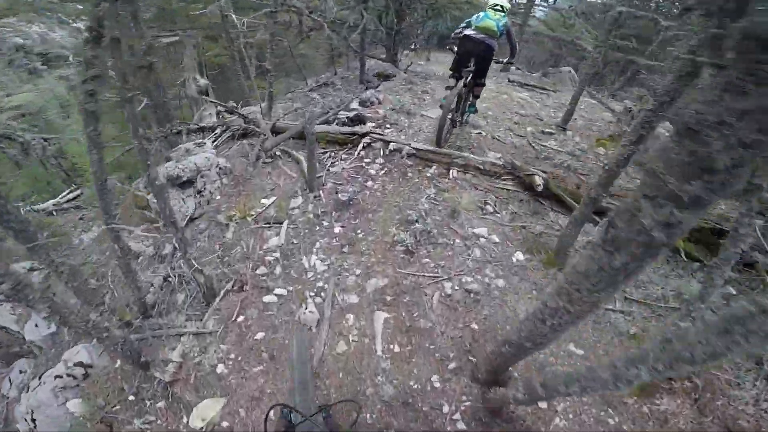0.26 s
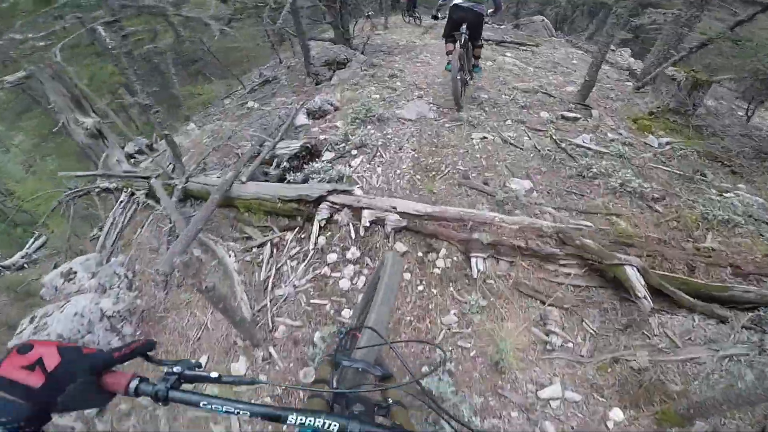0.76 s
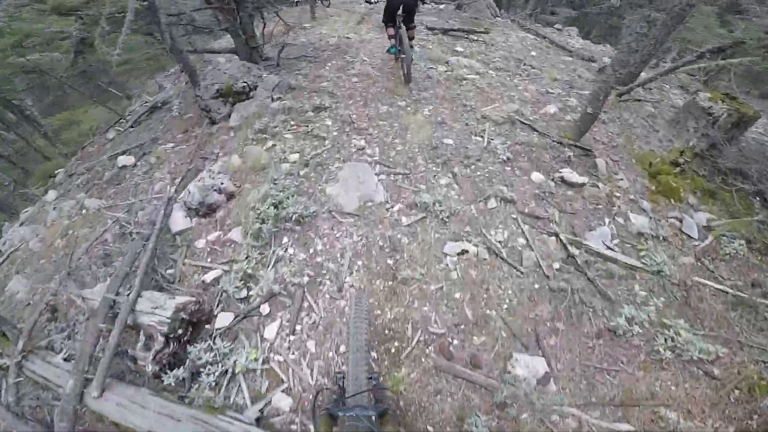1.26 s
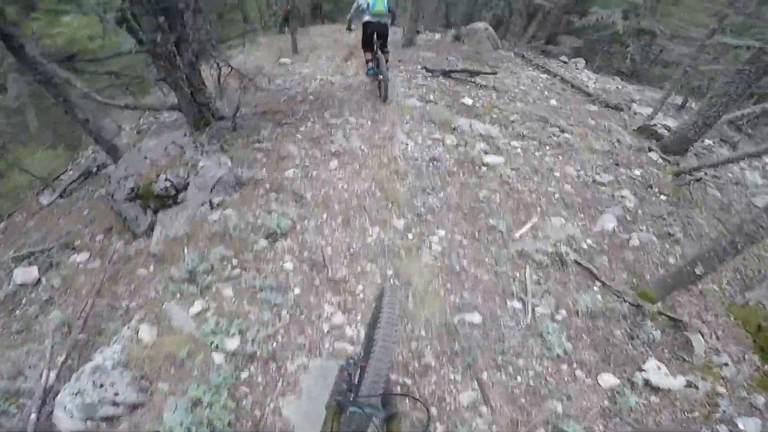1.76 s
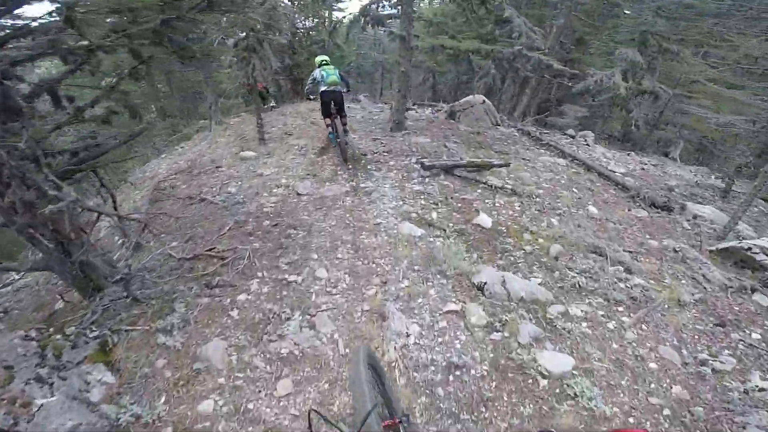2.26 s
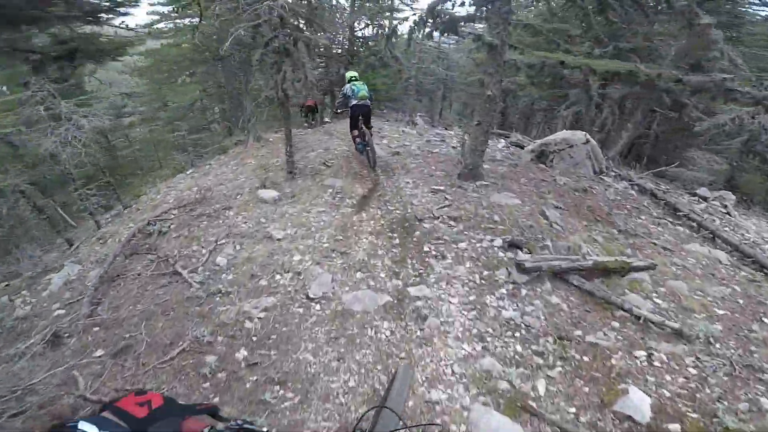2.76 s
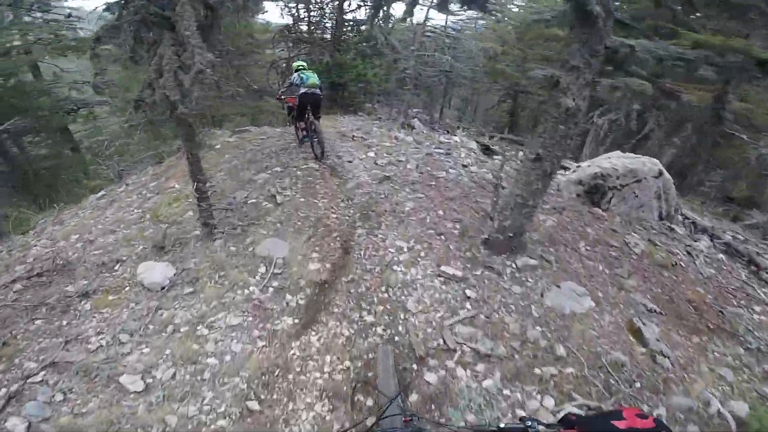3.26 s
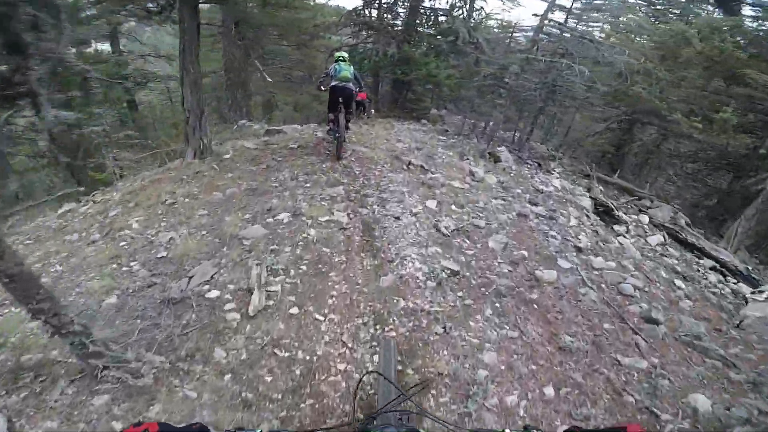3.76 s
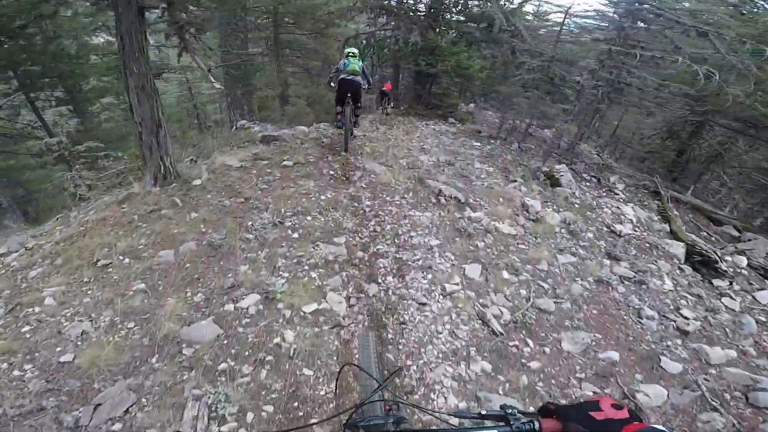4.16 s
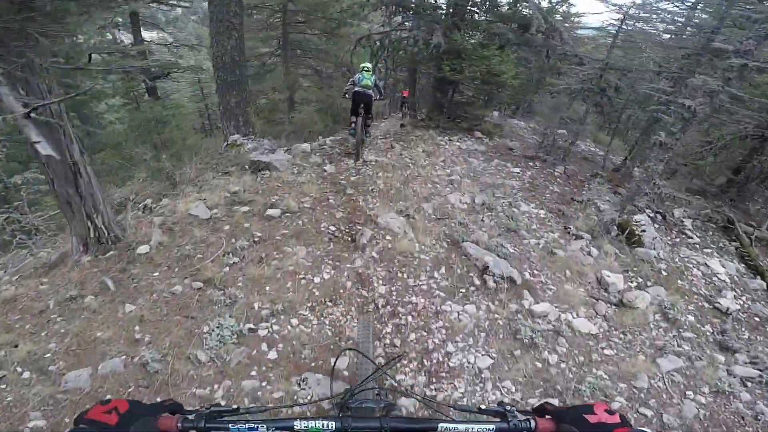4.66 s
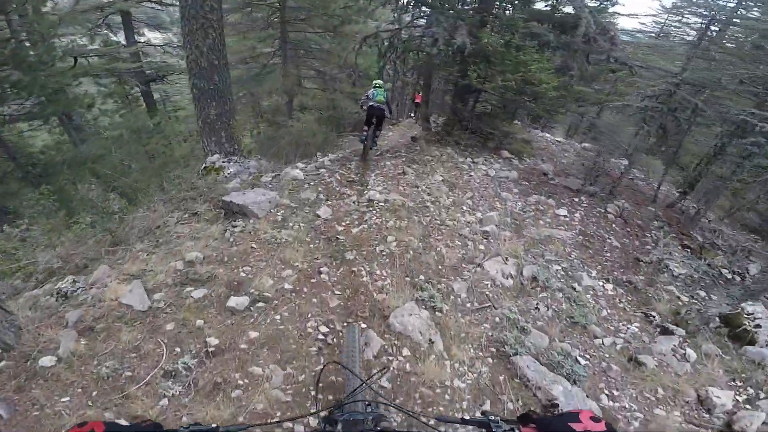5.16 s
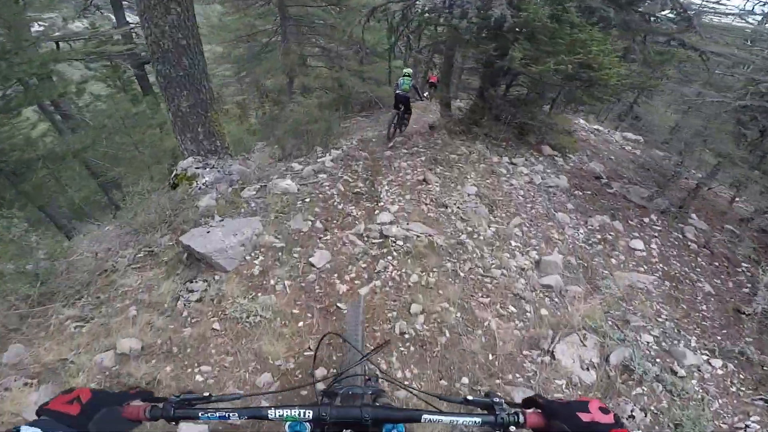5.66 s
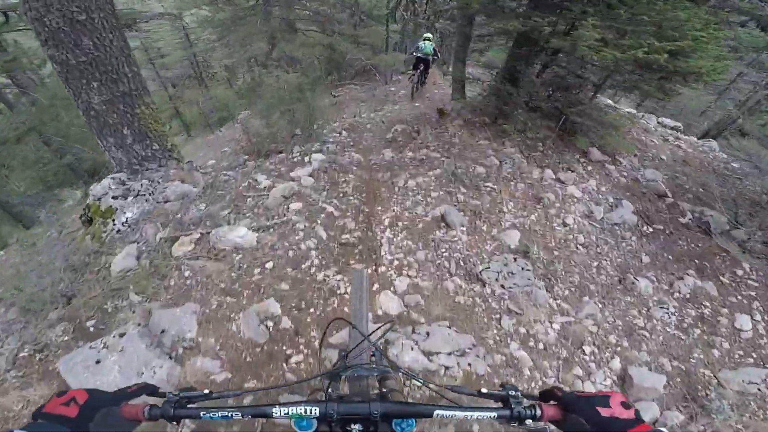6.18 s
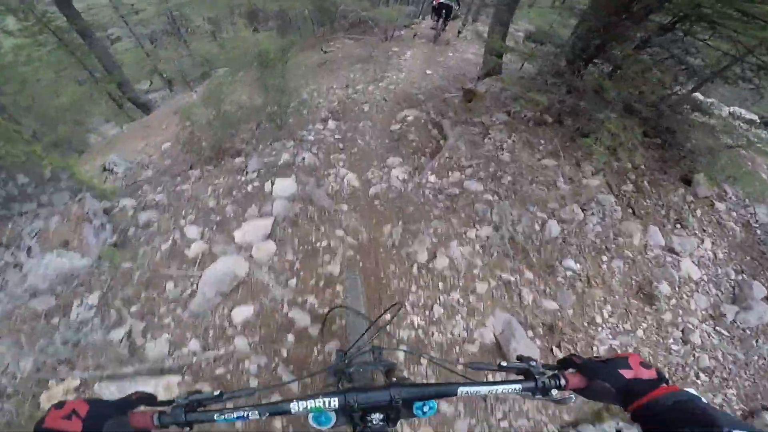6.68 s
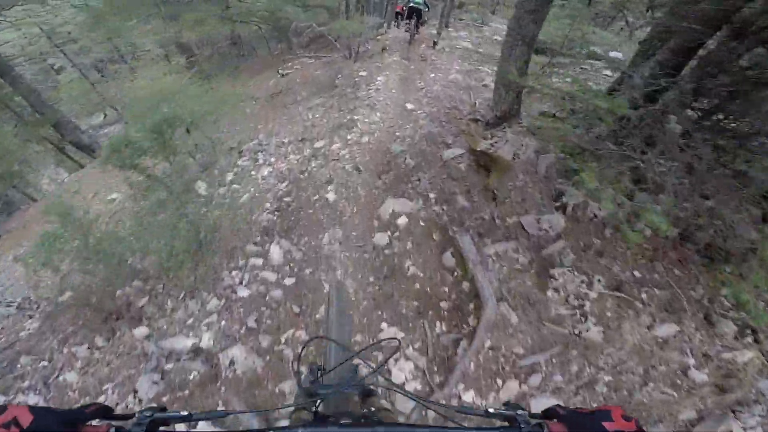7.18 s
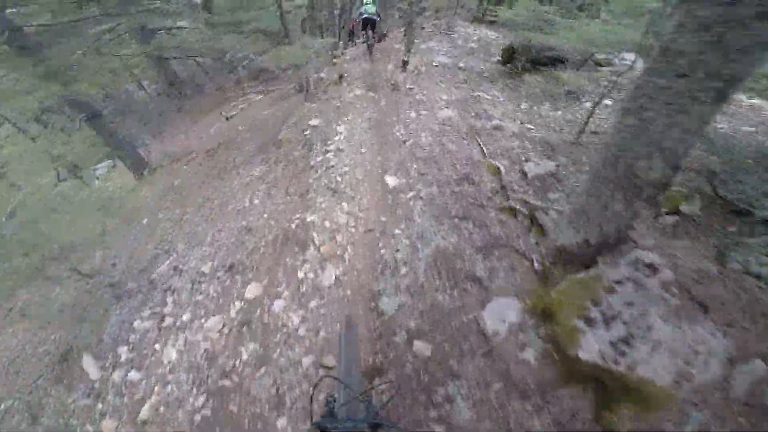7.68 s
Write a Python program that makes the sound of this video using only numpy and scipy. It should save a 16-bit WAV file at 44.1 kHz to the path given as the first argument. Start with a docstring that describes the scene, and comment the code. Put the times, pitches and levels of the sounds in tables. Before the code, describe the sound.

A mountain bike descends a stony forest trail, heard from a camera on the rider, dry and without echo. Throughout, deep wind rumble and fluttering gusts press on the microphone, with a thin air hiss above, continuous gravel crunch, gritty spray and popping pebbles. From 0 to 1.1 s heavy dull jolts thump, with a wheel slam and hollow knock near 1 s. Around 1.3-1.9 s come a rattle, knocks, chain ticks and sliding stones; another strong thump at 2.4 s. Stones clack on the frame from 2.6 to 3.7 s, then a hard slam with spraying gravel at 4 s. From 4.2 to 6 s it is calmer, mostly rolling crunch and wind, with small knocks near 5.2 s. From 6.1 s jolts return, peaking in thuds and rattles near 6.9 s. A wavering low brake hum sounds briefly at 7.1 s and 7.8 s amid busy metallic chain ticks, clanks and final slams at 7.5-7.9 s.

```python
"""Stony forest trail: a mountain bike runs down it fast, heard from a camera on the rider.
Tyres crunch, pop and spray stones (coloured random impacts, short decaying sines); jolts thump (sagging sines).
Slams are noise bursts; rattles and clacks ring resonators; knocks and clangs are decaying sines.
The chain ticks (gated noise through resonators) and a brake hums near the end (wavering sine, narrow noise).
Wind buffets the camera case and air hisses past (shaped noise)."""
import sys
import numpy as np
from scipy import signal
from scipy.fft import rfft, irfft
from scipy.io import wavfile
from scipy.ndimage import uniform_filter1d

SR = 44100
rng = np.random.default_rng(int(sys.argv[2]) if len(sys.argv) > 2 else 0)


def unload_wav(signal):
    """Save mono or channel-first audio to the path in sys.argv[1] as 16-bit WAV at rate SR, clipped to [-1, 1]."""
    wavfile.write(
        sys.argv[1],
        SR,
        np.round(np.clip(np.atleast_2d(signal).T, -1, 1) * 32767).astype(np.int16),
    )


N = 349713
TIME = np.arange(N) / SR
FREQS = np.fft.rfftfreq(N, 1 / SR)


def undb(db):
    """Decibels to gain."""
    return 10 ** (np.asarray(db) / 20)


def unit(x):
    """Scale to rms 1."""
    return x / np.sqrt(np.mean(x ** 2) + 1e-20)


def curves(table):
    """Columns of a (t/s, ..) table, interpolated to one value a sample."""
    s, *columns = np.transpose(table)
    return [np.interp(TIME, s, c) for c in columns]


def colour(x, points):
    """Filter by (f/Hz, level/dB) points; falls 23 dB/octave beyond the ends."""
    hz, db = np.transpose(points)
    octave, known = np.log2(FREQS + 1), np.log2(hz)
    outside = np.abs(octave - np.clip(octave, known.min(), known.max()))
    gain_db = np.interp(octave, known, db) - 23 * outside
    return irfft(rfft(x) * undb(gain_db), N)


def resonate(x, hz, width):
    """One resonance, gain 1 at its centre."""
    b, a = signal.iirpeak(min(hz, SR / 3), hz / min(width, SR / 5), fs=SR)
    return signal.lfilter(b, a, x)


def muffle(x, hz):
    """Steep low-pass."""
    return signal.sosfilt(signal.butter(4, min(hz, SR / 3), fs=SR, output="sos"), x)


def lowpass(x, order, hz):
    """Zero-phase low-pass, for splitting bands."""
    return signal.sosfiltfilt(signal.butter(order, hz, fs=SR, output="sos"), x)


def walk(rate):
    """Random levels held 1 / rate s and slewed; rms 1."""
    k = max(int(SR / rate), 1)
    held = np.repeat(rng.standard_normal(N // k + 1), k)
    return unit(uniform_filter1d(held, k)[:N])


def fade(t, t60):
    """Exponential decay, 60 dB down after t60."""
    return np.exp(-np.log(1000) * t / max(t60, 1e-3))


def add(out, s, sound, db):
    """Mix a sound in at time s; db is the level of its loudest 2 ms."""
    start = max(int(s * SR), 0)
    part = sound[:max(N - start, 0)]
    loudest = np.sqrt(uniform_filter1d(sound ** 2, size=88).max())
    out[start:start + len(part)] += undb(db) * part / loudest


def grains(rate, spread_db):
    """Random tiny impacts: many faint, a few strong."""
    size = undb(spread_db * np.minimum(rng.exponential(size=N), 4.5))
    return unit((rng.random(N) < rate / SR) * size * rng.choice([-1, 1], N))


# tyre levels before trim: [t/s, crunch level/dB, grit level/dB]
TYRE_LEVELS = [(0.03, -36, -46), (0.2, -40, -47), (0.73, -40.5, -46.5), (1.19, -46, -53.5),
               (1.66, -38.5, -47), (1.86, -38.5, -45), (2.56, -42.5, -50), (3.0, -37.5, -47.5),
               (3.42, -42.5, -51), (4.03, -35, -46.5), (4.14, -37, -48), (4.69, -40, -51),
               (5.12, -39, -50.5), (5.47, -41, -51), (5.8, -43, -53), (6.07, -38.5, -48.5),
               (6.78, -38.5, -48), (7.07, -34, -48), (7.42, -37, -47.5), (7.88, -39, -50)]
# crushed-stone spectrum, relative: [f/Hz, level/dB]
CRUNCH_SPECTRUM = [(210, 4.5), (350, 1.5), (503, -2.5), (585, -2), (742, -5.5), (1110, -6.5), (1430, -7.5),
                   (1560, -27), (2110, -7.5), (2300, -29.5), (2900, -32), (3770, -26), (6380, -120)]
# fine-grit spectrum, relative: [f/Hz, level/dB]
GRIT_SPECTRUM = [(1470, 9.5), (2500, 6.5), (2840, 0.5), (3110, 3.5), (3530, 0), (3870, -1.5), (4390, 0.5),
                 (5010, -6.5), (5900, 0), (6200, 2), (6910, -12), (7400, -18), (9620, -45), (16300, -120)]
# ploughed-stone spectrum, relative: [f/Hz, level/dB]
PLOUGH_SPECTRUM = [(250, 4), (430, 3.5), (582, -5), (816, -2), (916, -11), (1000, -3), (1280, -0.5),
                   (1570, -13), (1820, -8), (2760, -46), (3120, -38), (3600, -16), (4680, -64),
                   (7920, -120)]
CRUNCH_TRIM_DB, GRIT_TRIM_DB = 1, 2


def tyres(crunch_db, grit_db):
    """Knobs crush stones and spray grit in uneven patches; bumps dig in and plough bigger stones aside."""
    dig = np.zeros(N)
    for s, db, _, t60 in BUMP_RATTLES:
        bite = np.clip((TIME - s) / 0.00083 + .5, 0, 1)
        dig += undb(db) * bite * fade(np.maximum(TIME - s, 0), 4.7 * t60)
    patch = walk(45)
    stones = unit(colour(grains(rate=800, spread_db=1.5), CRUNCH_SPECTRUM))
    big = lowpass(stones, 2, 900)
    coarse_db = 0.96 * walk(30)  # ground varies between coarse and fine stones
    mixed = big * undb(coarse_db) + (stones - big) * undb(-coarse_db)
    crunch = mixed * undb(crunch_db + 2.1 * patch + CRUNCH_TRIM_DB)
    ploughed = unit(colour(grains(rate=1200, spread_db=2.5), PLOUGH_SPECTRUM)) * undb(-5.0) * dig
    grit = unit(colour(grains(rate=6700, spread_db=2.5), GRIT_SPECTRUM))
    rolling = undb(grit_db + 0.43 * patch + 1.42 * walk(110) + GRIT_TRIM_DB)
    return crunch + ploughed + grit * np.hypot(rolling, undb(-18.5) * dig)


PEBBLE_DB = -3  # against the untrimmed crunch
PEBBLE_HZ, PEBBLE_T60_S = (570, 2292), (0.0087, 0.078)  # big to small; dead to ringing


def pebbles(crunch_db, count):
    """Pebbles pop from under the knobs, each with its own pitch and ring; each strikes again within 18 ms."""
    out, t = np.zeros(N), TIME[:SR // 25]
    for when, size, ring, bounce in rng.random((count, 4)):
        hz = np.interp(size, (0, 1), PEBBLE_HZ)
        t60 = np.interp(ring, (0, 1), PEBBLE_T60_S)
        main = np.sin(2 * np.pi * hz * t) * fade(t, t60)
        low = np.sin(2 * np.pi * 0.577 * hz * t) * fade(t, t60 / 2)
        pop = main - undb(-4.0) * low
        at = int(when * N)
        db = crunch_db[at] + PEBBLE_DB
        add(out, TIME[at], pop, db)
        add(out, TIME[at] + 0.018 * bounce, pop, db - 1.5)
    return muffle(out, 2600)


# tyre slides that throw stones: [t/s, length/s, level/dB, middle f/Hz]
SLIDE_SPRAYS = [(1.74, 0.093, -37.5, 1010), (2.215, 0.033, -31.5, 980), (3.932, 0.059, -32.5, 970),
                (4.045, 0.059, -32.5, 890), (5.125, 0.051, -36.5, 690), (5.178, 0.073, -35, 770),
                (6.113, 0.07, -46, 1000), (6.886, 0.04, -29, 1160), (6.959, 0.11, -35, 1300),
                (7.661, 0.036, -30, 1380)]
SPRAY_STONES_PER_S, SPRAY_OCTAVES = 850, 0.74  # octaves either side of the middle
SPRAY_T60_CYCLES = 8.4


def sprays(count):
    """A sliding tyre throws stones in quick uneven succession, each clicking at its own pitch and strength."""
    out, t = np.zeros(N), TIME[:SR // 5]
    for s, length, db, middle_hz in SLIDE_SPRAYS:
        jitter, size, strength, side = rng.random((4, count, 1))
        when = (np.arange(count)[:, None] + 2 * jitter - 1) / SPRAY_STONES_PER_S
        hz = middle_hz * 2 ** (SPRAY_OCTAVES * (1 - 2 * size))
        cycles = np.maximum(t - when, 0) * hz
        within = np.clip((length - when) / 0.013 + .5, 0, 1)
        weight = np.sign(side - .5) * undb(10 * strength) * within
        clicks = weight * np.sin(2 * np.pi * cycles) * fade(cycles, SPRAY_T60_CYCLES)
        shower = np.sum(clicks, axis=0)
        rms = np.sqrt(np.sum(shower ** 2) / (length * SR))
        start = int(s * SR)
        out[start:start + len(t)] += (undb(db) * shower / rms)[:N - start]
    return muffle(out, 4600)


# jolts through the rider: [t/s, level before 3 dB cut/dB, nominal f/Hz, t60/s]
JOLTS = [(0.035, -9, 245, 0.018), (0.65, -8, 129, 0.094), (0.806, -7.5, 248, 0.058),
         (0.878, -13, 166, 0.086), (0.944, -11, 216, 0.044), (1.077, -11, 238, 0.036),
         (1.371, -21, 378, 0.024), (1.772, -14.5, 185, 0.038), (2.191, -14.5, 220, 0.025),
         (2.446, -6, 110, 0.039), (3.153, -9, 210, 0.032), (4.016, -13, 324, 0.063),
         (5.315, -23, 335, 0.032), (5.507, -23.5, 257, 0.025), (6.062, -11, 168, 0.073),
         (6.16, -21, 188, 0.072), (6.476, -14, 288, 0.025), (6.602, -13.5, 225, 0.014),
         (6.735, -11, 222, 0.093), (6.88, -9, 227, 0.031), (6.92, -14, 311, 0.077),
         (6.959, -6.5, 180.4, 0.18), (6.972, -13.5, 290, 0.094), (7.502, -8, 267, 0.038),
         (7.547, -14.5, 302, 0.027), (7.662, -16, 272, 0.033), (7.886, -9.5, 218, 0.037)]


def thumps():
    """A jolt shakes the camera mount for a few dull cycles; the note sags as the load comes off."""
    out, t = np.zeros(N), TIME[:SR // 5]
    for s, db, hz, t60 in JOLTS:
        push = 1 - fade(t, 0.024)
        phase = 2 * np.pi * hz * np.cumsum(0.911 + 0.15 * fade(t, 2 * t60)) / SR
        note = np.sin(phase) + undb(-11.5) * np.sin(1.47 * phase)
        add(out, s, push * note * fade(t, t60), db - 3.0)
    return out


# wheel into ground or rock: [t/s, level/dB, bottom f/Hz, top f/Hz, contact/s]
WHEEL_SLAMS = [(0.81, -22, 230, 650, 0.005), (1.049, -17.5, 350, 830, 0.0036),
               (3.986, -20, 950, 2400, 0.0029), (4.014, -13.5, 200, 1330, 0.012),
               (6.882, -16, 220, 1300, 0.013), (6.903, -21, 600, 1850, 0.0098),
               (6.958, -20, 300, 2140, 0.0069), (7.659, -20.5, 248, 2170, 0.011),
               (7.69, -20.5, 600, 2000, 0.008), (7.888, -18.5, 850, 1770, 0.0016)]
# bike response to a slam, relative: [f/Hz, level/dB]
THUD_SPECTRUM = [(200, 4), (380, 2), (650, -8.5), (900, -13), (1200, -7.5), (1650, -10), (2400, -20.5),
                 (4000, -3)]
SLAM_T60_S = 0.042


def slams():
    """A wheel hits hard: the whole bike judders while contact lasts, then stops short."""
    out, t = np.zeros(N), TIME[:SR // 10]
    judder = colour(rng.standard_normal(N), THUD_SPECTRUM)
    for s, db, bottom_hz, top_hz, contact_s in WHEEL_SLAMS:
        body = np.roll(judder, -int(s * SR))[:len(t)]
        body = muffle(muffle(body, top_hz), top_hz)
        body = signal.sosfilt(signal.butter(3, bottom_hz, "highpass", fs=SR, output="sos"), body)
        body = body / np.sqrt(uniform_filter1d(body ** 2, size=176) + 1e-20)  # even strength
        envelope = (1 - fade(t, 0.0019)) * fade(np.maximum(t - contact_s, 0), SLAM_T60_S)
        add(out, s, body * envelope, db)
    return out


# bumps over rock or root: [t/s, level before 4 dB cut/dB, clang centre f/Hz, blows t60/s]
BUMP_RATTLES = [(1.311, -27.5, 645, 0.13), (1.739, -21.5, 732, 0.065), (1.755, -45, 1090, 0.067),
                (3.2, -27.5, 552, 0.088), (3.464, -29.5, 1300, 0.05), (3.888, -25.5, 670, 0.12),
                (6.103, -25.5, 1250, 0.034), (6.89, -18.5, 810, 0.091), (6.966, -27.5, 1390, 0.061),
                (7.012, -27, 1000, 0.039), (7.516, -25.5, 900, 0.072), (7.699, -23, 1400, 0.043)]
# bike modes, also rung by clacks: [nominal f/Hz, width/Hz, relative level/dB]
FRAME_MODES = [(456, 81, 28), (650, 150, 21), (810, 66, -3), (810, 170, 15), (1240, 96, 17.5),
               (1240, 160, 20), (1440, 42, 15.5), (1640, 120, 9), (3300, 330, 8)]


def rattles():
    """Bumps set loose parts chattering; quick blows ring the frame modes near the clang's centre."""
    out, t = np.zeros(N), TIME[:SR // 4]
    for s, db, centre_hz, t60 in BUMP_RATTLES:
        blows = rng.standard_normal(len(t)) * (rng.random(len(t)) < 800 / SR) * fade(t, t60)
        blows[0] = 1.26  # a firm first blow
        shift = 1 + 0.02 * rng.standard_normal(len(FRAME_MODES))  # load on the bike moves the modes
        ring = np.zeros(len(t))
        for k, (hz, width, gain_db) in enumerate(FRAME_MODES):
            gain = undb(gain_db - 19 * abs(np.log2(hz / centre_hz)))
            ring += (-1) ** k * gain * resonate(blows, hz * shift[k], width)
        add(out, s, ring, db - 4.0)
    return muffle(out, 4400)


# stones on frame and rims: [t/s, level before final low-passes/dB, f/Hz]
STONE_CLACKS = [(2.189, -29.5, 1310), (2.621, -28, 1320), (2.772, -26.5, 990), (3.195, -27, 1990),
                (3.379, -27.5, 1200), (3.549, -25.5, 920), (3.629, -19, 1380), (3.666, -23.5, 1740),
                (3.961, -26, 1500), (4.094, -28, 940), (4.804, -26, 1700), (5.13, -29, 1900),
                (5.156, -28, 1970), (6.474, -25.5, 1270), (6.601, -21.5, 1570), (6.753, -33, 1350),
                (6.847, -22.5, 1130), (7.019, -26, 1210), (7.147, -24, 1300), (7.167, -25, 940),
                (7.663, -17, 1360), (7.89, -29, 1360)]


def clacks():
    """A stone gives a dead knock with a dry crack; the frame rings faintly and crumbs scatter."""
    out, t = np.zeros(N), TIME[:SR // 10]
    for s, db, hz in STONE_CLACKS:
        crumbs = 0.094 * rng.standard_normal(len(t)) * fade(t, 0.021)
        contact = signal.unit_impulse(len(t)) + crumbs
        knock = resonate(resonate(contact, hz, 590), hz, 840)
        ring = sum(undb(gain_db) * resonate(contact, f, width) for f, width, gain_db in FRAME_MODES)
        crack = resonate(contact, 1930, 600)
        clack = knock + undb(-22.5) * ring + undb(-10) * crack
        add(out, s, muffle(clack, 3.2 * hz), db)
    return muffle(muffle(out, 2840), 3300)


# bike on wood or bedded stone: [t/s, level/dB, f/Hz]
HOLLOW_KNOCKS = [(1.05, -24.5, 607), (1.35, -27, 470), (1.847, -21.5, 505), (2.077, -24.5, 610),
                 (3.63, -25.5, 643), (3.897, -27, 666), (5.199, -26, 800), (6.603, -24.5, 685),
                 (6.753, -31, 720)]
# knock modes: [multiple of f, relative level/dB]
HOLLOW_MODES = [(0.7, -1.5), (1, 1.5), (1.22, -9)]
KNOCK_T60_S = 0.034


def knocks():
    """A blunt blow rings a few close, low modes: a hollow 'tock' without a crack."""
    out, t = np.zeros(N), TIME[:SR // 10]
    for s, db, hz in HOLLOW_KNOCKS:
        ring = sum(undb(gain_db) * np.sin(2 * np.pi * multiple * hz * t)
                   for multiple, gain_db in HOLLOW_MODES)
        add(out, s, ring * (1 - fade(t, 0.0058)) * fade(t, KNOCK_T60_S), db)
    return out


# glancing blows that leave one part ringing: [t/s, level/dB, f/Hz, t60/s]
PART_CLANGS = [(1.807, -28.5, 1415, 0.045), (3.232, -30, 1380, 0.074), (4.018, -22, 1143, 0.025),
               (7.528, -25.5, 1160, 0.11), (7.66, -32, 2460, 0.049)]


def clangs():
    """A short metallic note; a weaker close partner roughens it."""
    out, t = np.zeros(N), TIME[:SR // 5]
    for s, db, hz, t60 in PART_CLANGS:
        partner = np.sin(2 * np.pi * (0.95 * hz * t + rng.random()))
        pair = np.sin(2 * np.pi * hz * t) + undb(-2.5) * partner
        add(out, s, pair * (1 - fade(t, 0.0056)) * fade(t, t60), db)
    return out


ROUGH_S = (7.1, 8.3)  # steep, rough stretch; ticks past the end of the scene are dropped
SLAP_DB, SLAP_SPREAD_DB, SLAP_HZ = -40.5, 3, (3020, 6060)  # spread is +-


def slaps(count):
    """Light ticks of the slapping chain at random moments of the rough stretch: (t/s, level/dB, f/Hz)."""
    when, strength, pitch = rng.random((count, 3)).T
    s = np.interp(when, (0, 1), ROUGH_S)
    db = SLAP_DB + SLAP_SPREAD_DB * (2 * strength - 1)
    return list(zip(s, db, np.interp(pitch, (0, 1), SLAP_HZ)))


JINGLE_DB, JINGLE_SPREAD_DB = 4, 4  # against the untrimmed grit; spread is +-


def jingles(grit_db, count):
    """The chain is never quite still: faint ticks grow with ground roughness: (t/s, level/dB, f/Hz)."""
    when, strength, pitch = rng.random((count, 3)).T
    at = (when * N).astype(int)
    db = grit_db[at] + JINGLE_DB + JINGLE_SPREAD_DB * (2 * strength - 1)
    return list(zip(TIME[at], db, np.interp(pitch, (0, 1), SLAP_HZ)))


# chain on guide and cogs: [t/s, level before the case/dB, f/Hz]
CHAIN_TICKS = [(1.028, -35, 3720), (1.334, -39.5, 3610), (1.722, -39, 4200), (1.807, -39, 4300),
               (1.843, -33, 4530), (1.854, -33.5, 4900), (2.6597, -38.5, 4000), (3.151, -36, 3280),
               (3.5503, -39, 3430), (4.362, -42, 3600), (6.1047, -39, 3700), (6.5333, -34.5, 3520),
               (6.602, -37, 3300), (6.81, -37, 4200), (6.903, -35, 3200), (6.959, -32, 3000),
               (7.134, -36, 3450), (7.186, -38, 3870), (7.213, -38, 5870), (7.237, -35.5, 4530),
               (7.272, -31, 5940), (7.396, -35.5, 4200), (7.5512, -39, 4500), (7.598, -38, 5200),
               (7.681, -35, 3800)]


def chain(grit_db):
    """Steel links click in a quick uneven stutter, ring very short, coloured by the camera case."""
    out, t = np.zeros(N), TIME[:SR // 12]
    for s, db, hz in CHAIN_TICKS + slaps(count=18) + jingles(grit_db, count=90):
        stutter = rng.standard_normal(len(t)) * (0.39 + (rng.random(len(t)) < 2500 / SR))
        scrape = stutter * (1 - fade(t, 0.014)) * fade(t, 0.018)
        link = resonate(scrape, hz, 600)
        link += undb(-9) * resonate(scrape, 4100, 1600)
        link += undb(-2.5) * resonate(scrape, 5830, 520)
        add(out, s - .001, link, db)
    dull = lowpass(out, 8, 6500)
    return dull + undb(-10) * (out - dull)  # some sharp edge gets through the case


# dragging brake: [t/s, f before waver/Hz, main note level/dB]
BRAKE_DRAG = [(7.0, 304, -40), (7.06, 302, -27), (7.15, 301, -29.5), (7.2, 298, -43), (7.32, 298, -35.5),
              (7.45, 298, -55), (7.6, 307, -52), (7.77, 301, -30), (7.93, 295, -59)]


def brake():
    """Pads dragging on the disc hum a wavering note with a weaker upper mode."""
    hz, db = curves(BRAKE_DRAG)
    pressed = np.clip((TIME - 6.96) / 0.03, 0, 1)
    phase = 2 * np.pi * np.cumsum(hz * (1 + 0.0048 * walk(40))) / SR
    upper = unit(resonate(rng.standard_normal(N), 500, 6.9))
    return pressed * undb(db) * (np.sqrt(2) * np.sin(phase) + undb(-8.5) * upper)


GUST_ATTACK_S, GUST_T60_S = 0.032, 0.15


def gust(start, length):
    """A gust builds up quickly, holds and dies away."""
    rise = np.clip((TIME - start) / GUST_ATTACK_S + .5, 0, 1)
    return rise * fade(np.maximum(TIME - start - length, 0), GUST_T60_S)


# steady flow on the case, before eddy trims: [t/s, level/dB]
STEADY_FLOW = [(0.03, -13.5), (0.9, -17.5), (1.32, -13.5), (1.45, -18), (2.89, -18.5), (3.15, -15.5),
               (4.99, -18), (5.17, -20), (6.44, -20.5), (6.63, -13.5), (7.42, -15.5), (7.88, -20)]
# gusts on the case: [start t/s, length/s, rumble level/dB, flutter level/dB]
CASE_GUSTS = [(0.0, 0.0085, -7.5, -10), (0.294, 0.033, -11.5, -25), (0.594, 0.18, -18, -13),
              (0.785, 0.068, -24, -12), (0.871, 0.08, -29, -11), (0.99, 0.11, -30, -13),
              (1.133, 0.13, -17, -15.5), (1.38, 0.12, -17, -27.5), (1.646, 0.15, -18.5, -19),
              (1.912, 0.043, -13, -31), (2.063, 0.041, -20, -22.5), (2.274, 0.014, -9, -11.5),
              (2.323, 0.058, -15, -17), (2.435, 0.0072, -13, -15.5), (2.527, 0.11, -12.5, -18.5),
              (2.924, 0.22, -15.5, -21.5), (3.112, 0.18, -17, -15), (3.274, 0.087, -12.5, -28),
              (3.5, 0.072, -19, -25), (3.67, 0.14, -16.5, -16), (3.903, 0.21, -25, -18.5),
              (4.094, 0.11, -12, -20), (4.476, 0.076, -16.5, -23), (4.68, 0.036, -17.5, -23),
              (4.883, 0.083, -14.5, -21.5), (5.87, 0.12, -14.5, -24), (6.028, 0.14, -18.5, -23),
              (6.418, 0.21, -15, -28.5), (6.69, 0.3, -18, -17), (7.084, 0.051, -10.5, -24),
              (7.26, 0.15, -14.5, -22.5), (7.46, 0.096, -13, -15.5), (7.611, 0.099, -14.5, -25),
              (7.859, 0.046, -12, -13.5)]
RUMBLE_DB, FLUTTER_DB = -2, -12  # large and small eddies against the steady flow


def wind_levels():
    """Large- and small-eddy levels in dB: gusts add their power to the steady flow."""
    flow_db, = curves(STEADY_FLOW)
    rumble = undb(flow_db + RUMBLE_DB) ** 2
    flutter = undb(flow_db + FLUTTER_DB + 2 * walk(14)) ** 2
    for start, length, rumble_db, flutter_db in CASE_GUSTS:
        shape = gust(start, length)
        rumble = rumble + (undb(rumble_db) * shape) ** 2
        flutter = flutter + (undb(flutter_db) * shape) ** 2
    return 10 * np.log10(rumble), 10 * np.log10(flutter)


def eddies(spectrum, span_s):
    """Turbulent pressure, power evened over span_s so that the gusts set its strength."""
    x = colour(rng.standard_normal(N), spectrum)
    k = max(int(span_s * SR), 2)
    power = uniform_filter1d(uniform_filter1d(x ** 2, k), k)
    return unit(x / np.sqrt(power + 1e-20))


# large-eddy spectrum, relative: [f/Hz, level/dB]
RUMBLE_SPECTRUM = [(7.1, -36), (12, 3.5), (32, 4.5), (85, -6.5), (110, -23), (190, -120)]
# small-eddy spectrum, relative: [f/Hz, level/dB]
FLUTTER_SPECTRUM = [(44, -6), (75, 3), (156, -2.5), (306, -18), (442, -29.5), (507, -25.5), (560, -42.5),
                    (800, -44), (1040, -85), (1760, -120)]


def wind():
    """Large eddies rumble; small ones flutter on top in bursts and reach higher in a lasting gust."""
    rumble_db, flutter_db = wind_levels()
    rumble = eddies(RUMBLE_SPECTRUM, span_s=0.06) * undb(rumble_db + 0.29 * walk(27))
    small = eddies(FLUTTER_SPECTRUM, span_s=0.046)
    slow = lowpass(small, 3, 230)
    lasting_db = uniform_filter1d(flutter_db, size=SR // 3)
    reach = undb(np.minimum(0.15 * (lasting_db + 14.5) + 3.5 * walk(45) - 2, 2))
    flutter = (slow + reach * (small - slow)) * undb(flutter_db + 3.3 * walk(50))
    return rumble + flutter


# air-rush spectrum, relative: [f/Hz, level/dB]
HISS_SPECTRUM = [(4000, -44), (6800, -5), (7840, -1.5), (8890, 2), (11800, -7.5), (13900, -8), (15300, -7)]
AIR_DB, AIR_DB_PER_GRIT_DB = -57.5, 0.47  # level at mean grit; both grow with speed


def air(grit_db):
    """Smooth high hiss of air passing the case, stronger when the bike runs fast."""
    air_db = AIR_DB + AIR_DB_PER_GRIT_DB * (grit_db - grit_db.mean())
    hiss = unit(colour(rng.standard_normal(N), HISS_SPECTRUM))
    return hiss * undb(air_db + 0.66 * walk(25))


def scene():
    """Everything rides with the camera in the open, so there is no echo."""
    crunch_db, grit_db = curves(TYRE_LEVELS)
    ground = tyres(crunch_db, grit_db) + pebbles(crunch_db, count=420) + sprays(count=100)
    blows = thumps() + slams() + rattles() + clacks() + knocks() + clangs()
    bike = blows + chain(grit_db) + brake()
    return (ground + bike + wind() + air(grit_db))[None]


TOP_HZ, CEILING = 15300, 0.81


def record(dry):
    """The camera rounds the biggest pressure swings and cuts the top."""
    rounded = dry / (1 + (dry / CEILING) ** 6) ** (1 / 6)
    return signal.sosfilt(signal.ellip(10, .2, 80, TOP_HZ, fs=SR, output="sos"), rounded)


dry = scene()
out = record(dry)
unload_wav(out)
```